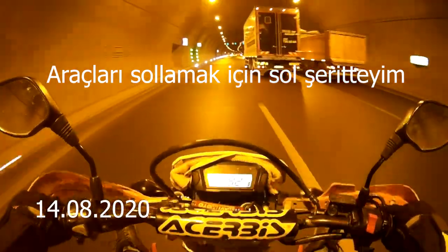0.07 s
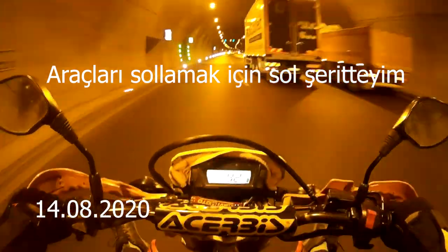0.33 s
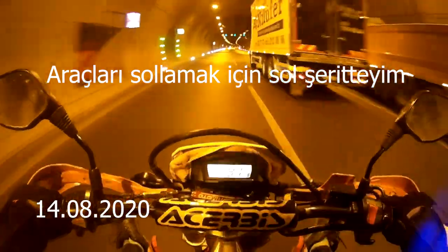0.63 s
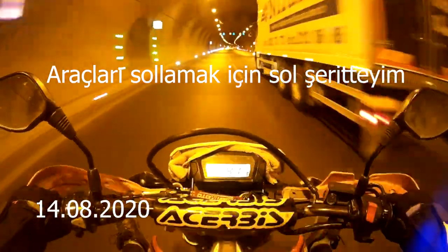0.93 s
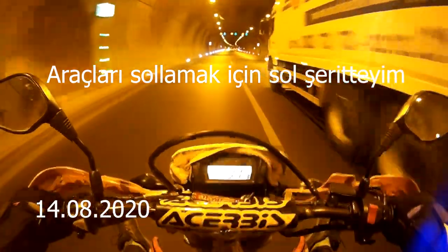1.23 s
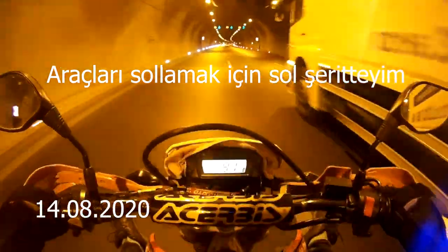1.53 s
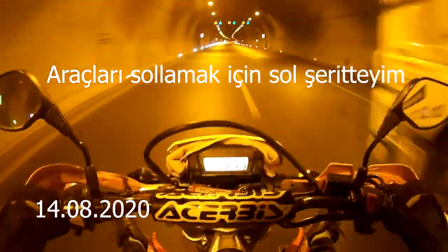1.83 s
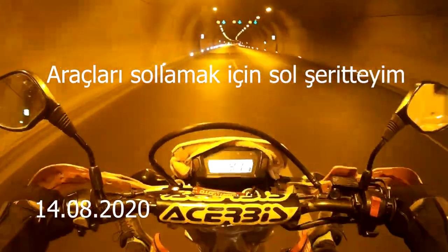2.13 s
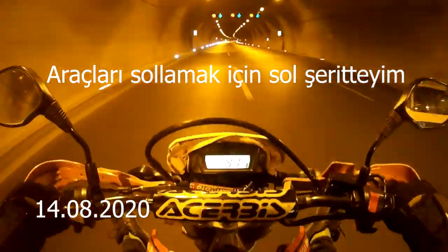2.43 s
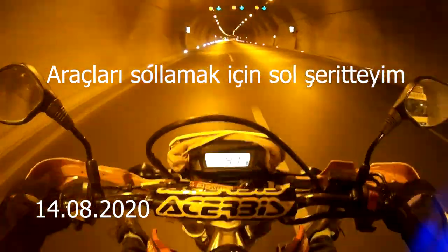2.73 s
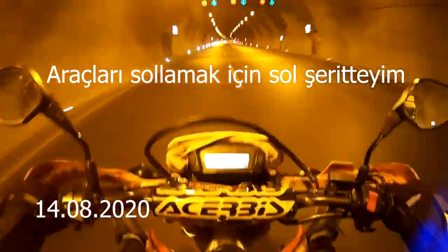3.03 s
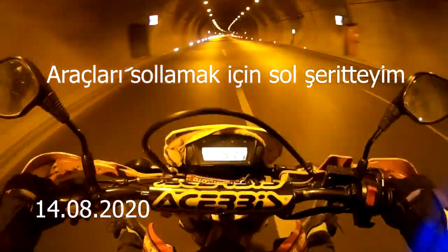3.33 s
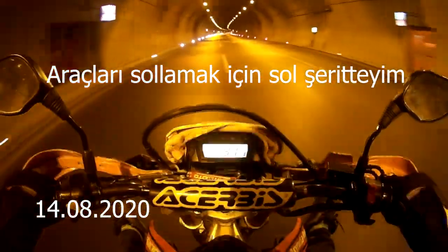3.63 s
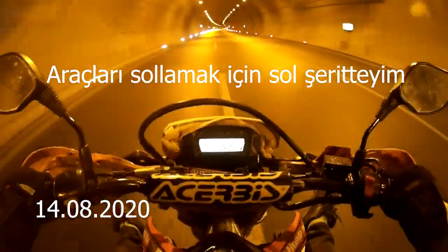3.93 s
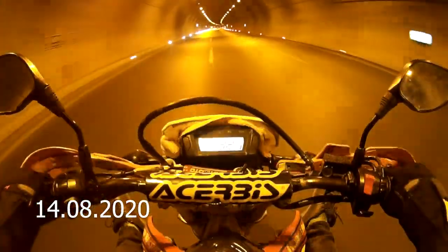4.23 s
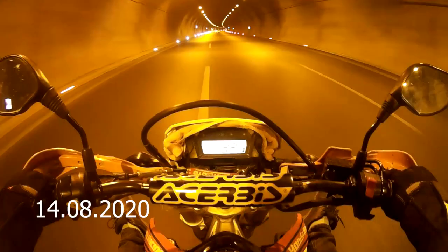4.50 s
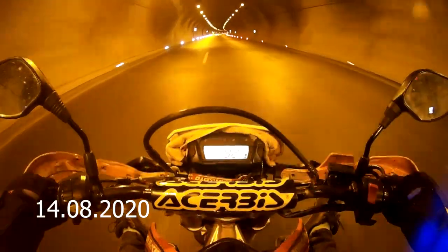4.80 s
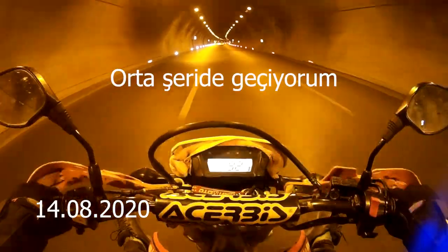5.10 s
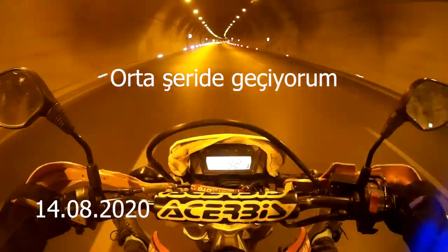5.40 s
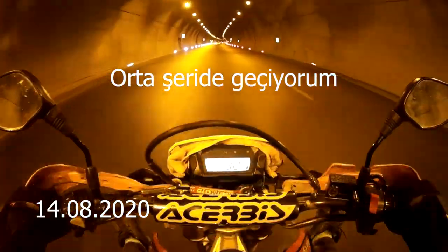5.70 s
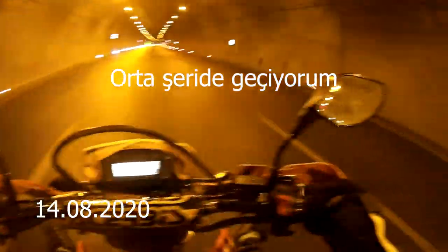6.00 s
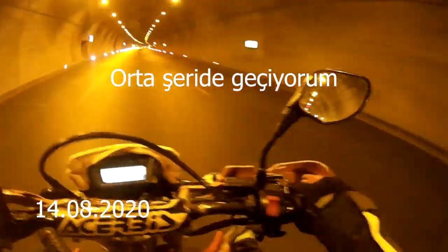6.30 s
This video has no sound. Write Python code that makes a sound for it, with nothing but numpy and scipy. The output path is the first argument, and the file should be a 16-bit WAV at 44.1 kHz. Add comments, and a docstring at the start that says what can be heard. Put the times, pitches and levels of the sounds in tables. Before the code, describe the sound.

A motorcycle cruises steadily through a tunnel, its engine humming under wind rumble and tyre roar as it overtakes a droning lorry.

```python
"""A single-cylinder motorcycle cruises through a road tunnel, heard from the rider's chest.
Its exhaust, chain and gears are periodic sources locked to the crank; they hum over the broadband
noise of turbulent wind and rolling tyres. It overtakes a lorry, whose drone and tyre howl drop in
pitch and reverberate in the tube. After four seconds the throttle opens a little."""
import sys
import numpy as np
from scipy import signal
from scipy.fft import rfft, irfft
from scipy.io import wavfile
from scipy.ndimage import uniform_filter1d

SR = 44100
rng = np.random.default_rng(int(sys.argv[2]) if len(sys.argv) > 2 else 0)


def wav_record(signal):
    """Record a signal, one row per channel, as 16-bit PCM in the file named by sys.argv[1]."""
    frames = np.transpose(np.atleast_2d(signal))
    bounded = np.clip(frames, -1, 1)
    # unit amplitude maps onto the largest positive 16-bit level
    quanta = np.round(bounded * 32767).astype(np.int16)
    wavfile.write(sys.argv[1], SR, quanta)


N = 288855
TIME = np.arange(N) / SR
BIN_HZ = np.maximum(np.arange(N // 2 + 1) * SR / N, 1e-3)

# noise along the ride: (time [s], relative tyre roar level [dB], relative case clatter level [dB])
ROAR_AND_CLATTER = [(0, -35, -51), (1.1, -36, -51), (1.7, -34, -50), (2.2, -35.5, -52), (3.1, -38.5, -52.3),
                    (4, -36.5, -52.5), (5.8, -37.5, -53), (6.35, -36.5, -51.5), (6.55, -41.5, -51.5)]


def from_db(db):
    """Amplitude ratio of a level: tenfold for every 20 dB."""
    return 10 ** (np.asarray(db) / 20)


def rms_one(x):
    """Normalisation to unit mean power."""
    return x / np.sqrt(np.mean(np.abs(x) ** 2) + 1e-20)


def in_time(rows):
    """Linear interpolation of each column after the time column, at every sample."""
    times, *columns = np.transpose(rows)
    return [np.interp(TIME, times, column) for column in columns]


def phase(hz):
    """Phase in radians is the time integral of angular frequency."""
    return 2 * np.pi * np.cumsum(hz) / SR


def swell(at_s, half_length_s):
    """A Gaussian envelope of height 1."""
    return np.exp(-((TIME - at_s) / half_length_s) ** 2)


def drift(cutoff_hz):
    """Slow random modulation: low-passed noise of unit power."""
    times = np.linspace(0, N / SR, 4096)
    hz = np.fft.rfftfreq(len(times), times[1])
    slow = irfft(rfft(rng.standard_normal(len(times))) / (1 + (hz / cutoff_hz) ** 4))
    return np.interp(TIME, times, rms_one(slow))


def noise(spectrum, resonances=()):
    """Spectral shaping: white noise takes on a broad colour and resonance peaks, at unit power."""
    hz, db = np.transpose(spectrum)
    colour_db = np.interp(np.log(BIN_HZ), np.log(hz), db)
    for centre, width, peak_db in resonances:
        colour_db += peak_db / (1 + (2 * (BIN_HZ - centre) / width) ** 2)
    skirts = np.minimum(BIN_HZ / hz[0], 1) ** 2 * np.minimum(hz[-1] / BIN_HZ, 1) ** 2
    white = rfft(rng.standard_normal(N))
    return rms_one(irfft(white * from_db(colour_db) * skirts, N))


def steadied(x, window_s):
    """Division by the running RMS evens out the chance swells of a noise."""
    return x / np.sqrt(uniform_filter1d(x ** 2, int(window_s * SR)) + 1e-9)


def tone(angle, scatter, flutter_hz):
    """Multipath interference: a direct sine plus wall reflections that shift as the bike moves."""
    walls = (drift(flutter_hz) + 1j * drift(flutter_hz)) / np.sqrt(2)
    direct = np.exp(1j * (angle + 2 * np.pi * rng.random()))
    return rms_one(np.real((1 + scatter * walls) * direct))


def partials(angle, series, scatter, flutter_hz):
    """Superposition of multiples of one frequency, each with its own reflections."""
    return sum(from_db(db) * tone(multiple * angle, scatter, flutter_hz) for multiple, db in series)


def motorcycle():
    """Periodic excitation: the firing rate sets the pitch of exhaust, intake, gears and chain."""
    # engine running: (time [s], firing rate [Hz], load level [dB])
    engine = [(0, 45.84, -1), (1.1, 45.75, -1), (2.6, 45.7, -.5), (3.6, 45.76, -.5), (4.3, 45.88, 0),
              (5.1, 46.06, 1.5), (5.9, 46.27, 1), (6.55, 46.5, 1)]
    # exhaust boom: (multiple of firing rate, level [dB])
    exhaust_series = [(1, -49), (2, -36.5), (3, -43.5), (4, -50.5), (5, -45.5), (6, -40)]
    # intake snarl: (multiple of firing rate, level at 0 dB load [dB])
    intake_series = [(7, -42), (8, -52), (10, -54), (11, -50.5), (12, -55.5), (13, -61), (14, -57.5),
                     (15, -60.5), (16, -69)]
    # gears and valve train: (multiple of firing rate, level at 0 dB load [dB])
    gear_series = [(25, -68), (27, -65.5), (32, -70), (45, -70), (50, -74), (52, -68), (54, -68), (55, -71),
                   (58, -67.5), (70, -75), (86, -82.5), (96, -78.5), (97, -83)]
    teeth_per_firing = 22.225
    firing_hz, load_db = in_time(engine)
    cycle = phase(firing_hz)
    exhaust = partials(cycle, exhaust_series, scatter=.66, flutter_hz=3.9)
    intake = from_db(load_db) * partials(cycle, intake_series, scatter=.4, flutter_hz=2.85)
    mesh = from_db(-64.5 + 2.4 * load_db) * tone(teeth_per_firing * cycle, scatter=.93, flutter_hz=2.7)
    gears = from_db(.6 * load_db) * partials(cycle, gear_series, scatter=.74, flutter_hz=3.8)
    return exhaust + intake + mesh + gears + clatter(cycle) + chain(cycle)


def clatter(cycle):
    """Structural resonance: combustion and valve knocks ring the engine cases in every cycle."""
    # knock spectrum: (frequency [Hz], relative spectral level [dB])
    spectrum = [(700, 2), (1080, 1), (1250, 6), (1400, 3.5), (1530, 4.5), (1700, -2.5), (1900, -4),
                (2250, -3), (2500, 0.5), (2800, -3.5), (3400, -12.5), (4500, -14), (5200, -20), (9000, -31)]
    # modes of cases and fairing: (frequency [Hz], width [Hz], peak gain [dB])
    modes = [(2020, 55, 0), (3080, 140, 1), (3860, 210, 4), (4480, 290, 3), (4800, 120, 2.5),
             (5650, 150, 1.5), (5960, 210, 4), (7470, 700, 6), (8450, 160, 7.5)]
    _, clatter_db = in_time(ROAR_AND_CLATTER)
    knock_db = .5 * np.cos(cycle) + .45 * np.cos(2 * cycle) + .45 * np.cos(3 * cycle)
    knocks = from_db(knock_db + .35 * drift(25))
    return from_db(clatter_db + 2.5) * rms_one(knocks * noise(spectrum, modes))


def chain(cycle):
    """Periodic impact of links on the sprocket gives a hum and two whining harmonics."""
    # whine, peaking as the throttle opens:
    # (time [s], relative second harmonic level [dB], relative third harmonic level [dB])
    whine = [(0, -56, -59.5), (.9, -53, -62), (1.35, -50, -53.5), (1.85, -58, -55.5), (3.3, -54, -72),
             (4.85, -51, -59), (5.1, -42.5, -58), (5.3, -46.5, -60), (5.8, -53, -59.5),
             (6.55, -49.5, -52.5)]
    links_per_firing = 6.222
    second_db, third_db = in_time(whine)
    links = links_per_firing * cycle
    hum = from_db(-42.5) * tone(links, scatter=.41, flutter_hz=2.4)
    second = from_db(second_db + 1.5) * tone(2 * links, scatter=.15, flutter_hz=21)
    third = from_db(third_db - .5) * tone(3 * links, scatter=.9, flutter_hz=12)
    return hum + second + third


def lorry():
    """Doppler shift: a diesel drone and howling tyres fall in pitch as the bike goes by."""
    # the pass: (time [s], heard firing rate [Hz], howl frequency [Hz], relative howl level [dB])
    passing = [(0, 85.77, 481.4, -42), (.4, 85.7, 465.8, -42.5), (.8, 84.41, 442, -34.5),
               (1.2, 82.6, 434.9, -42), (1.7, 80.44, 430, -37.5), (2.4, 80.73, 429.8, -43.5),
               (3.5, 80.25, 424.3, -47.5), (4.5, 80.22, 422, -49.5), (6.55, 81.8, 418, -83)]
    # the drone swells and fades along the tube: (time [s], relative level [dB])
    drone_levels = [(0, -28), (.35, -26.5), (.85, -38.5), (1.2, -23), (1.44, -29), (1.54, -22.5),
                    (1.75, -31), (2.15, -24.5), (2.48, -34), (2.75, -25.5), (3.55, -26.5), (3.9, -24),
                    (4.35, -31), (4.75, -27), (5.05, -40), (5.42, -29), (5.95, -34), (6.12, -21.5),
                    (6.55, -30)]
    # its octave booms now and then: (time [s], level [dB])
    boom_levels = [(0, -40), (.32, -23), (.47, -35), (1.45, -37), (1.63, -28), (2.08, -29), (2.3, -38.5),
                   (3, -30.5), (3.25, -36), (3.7, -29.5), (4.4, -33.5), (4.95, -33.5), (5.2, -43.5),
                   (6.55, -33.5)]
    # tread blocks of several lengths: (multiple of howl frequency, relative level [dB])
    tread = [(1, -0.5), (1.075, -10), (1.125, -6.5), (1.19, -17.5)]
    firing_hz, howl_hz, howl_db = in_time(passing)
    (drone_db,), (boom_db,) = in_time(drone_levels), in_time(boom_levels)
    cycle = phase(firing_hz)
    # the drone beats against its reflection from the walls
    beat_hz, crest_s, depth_db = 3.14, 1.565, 4.2
    beat_db = depth_db * np.cos(2 * np.pi * beat_hz * (TIME - crest_s))
    drone = from_db(drone_db + beat_db - 2.5) * tone(cycle, scatter=.55, flutter_hz=7)
    boom = from_db(boom_db) * tone(2 * cycle, scatter=.25, flutter_hz=8)
    howl = from_db(howl_db - .5) * partials(phase(howl_hz), tread, scatter=2.4, flutter_hz=13.3)
    direct = drone + boom + howl
    return direct + lorry_wheels() + from_db(-18) * tunnel(direct)


def lorry_wheels():
    """Band-limited noise: the trailer tyres sing in a narrow band and hiss in a broad one."""
    # wheels going by: (time [s], song level [dB], relative hiss level [dB])
    levels = [(0, -44.5, -61), (.3, -44.5, -57), (.7, -47.5, -63), (1.05, -43.5, -73), (1.35, -52.5, -66),
              (1.7, -70, -72), (2.1, -60, -79), (3, -47.5, -82), (6.55, -82, -85)]
    # tyre song: (frequency [Hz], relative spectral level [dB])
    song_spectrum = [(560, -20), (605, -14.5), (622, 0.5), (655, -12.5), (700, -7.5), (740, -11.5),
                     (800, -31)]
    # tyre hiss: (frequency [Hz], relative spectral level [dB])
    hiss_spectrum = [(1700, 8.5), (2400, -2), (3000, 12.5), (4100, 0), (4600, -6), (5200, -10),
                     (7300, -18.5), (11000, -15)]
    song_db, hiss_db = in_time(levels)
    return from_db(song_db) * noise(song_spectrum) + from_db(hiss_db - 1) * noise(hiss_spectrum)


def tunnel(x, t60_s=1.8):
    """Reverberation: the diffuse field in the concrete tube decays exponentially."""
    tail = rng.standard_normal(N) * from_db(-60 * TIME / t60_s)
    return rms_one(irfft(rfft(x) * rfft(tail), N)) * np.std(x)


def wind():
    """Turbulence: eddies thump as pressure fluctuations while air rushes round the rider."""
    # air, rougher in the lorry's wake: (time [s], buffet level [dB], relative rush level [dB])
    flow = [(0, -25, -25), (.8, -31, -25.5), (1.6, -30.5, -25.5), (2.1, -33.5, -27.5), (3, -29, -27.5),
            (4.3, -30.5, -28), (5.4, -33, -28), (6.55, -30, -28)]
    # gusts on top of that flow: (time [s], buffet rise [dB])
    gusts = [(.09, 0.5), (.76, 6), (1.29, 3), (1.55, 3), (2.42, 2), (3.0, 1), (3.16, 5), (4.02, 0),
             (4.66, 3.5), (4.98, 2.5), (5.89, 6), (6.18, 5.5), (6.37, 4)]
    # buffeting: (frequency [Hz], relative spectral level [dB])
    buffet_spectrum = [(8, -15), (16, 3.5), (28, 3.5), (50, 3), (70, -3), (100, -21), (200, -36)]
    # rush: (frequency [Hz], relative spectral level [dB])
    rush_spectrum = [(60, -0.5), (95, -1.5), (130, 1), (150, -2.5), (185, 0), (205, -1.5), (228, -2),
                     (248, -5), (272, -2), (303, -12.5), (335, -9), (385, -12.5), (500, -36), (900, -41)]
    buffet_db, rush_db = in_time(flow)
    gust_db = sum(rise_db * swell(at_s, half_length_s=.061) for at_s, rise_db in gusts)
    buffet = from_db(buffet_db + gust_db) * steadied(noise(buffet_spectrum), window_s=.22)
    rush = from_db(rush_db - 2 + .15 * gust_db) * steadied(noise(rush_spectrum), window_s=.1)
    return buffet + rush


def tyre_roar():
    """Rolling noise of all the tyres in the tunnel, louder beside the lorry."""
    # roar: (frequency [Hz], relative spectral level [dB])
    spectrum = [(250, -4), (380, -5.5), (440, -1.5), (500, 1), (545, -6), (620, -8), (700, -14), (800, -16),
                (950, -21.5), (1100, -30), (1600, -31.5)]
    roar_db, _ = in_time(ROAR_AND_CLATTER)
    return from_db(roar_db - 1.44) * noise(spectrum)


def hiss():
    """Stationary noise: a faint, even hiss under everything."""
    # hiss: (frequency [Hz], relative spectral level [dB])
    spectrum = [(2000, -13), (6000, -4.5), (10000, -2.5), (14800, -2.5), (16000, -7)]
    return from_db(-69) * noise(spectrum)


def lorry_wake():
    """Turbulence in the wake behind the lorry's cab swells and fades as the bike rides through it."""
    # churning air: (frequency [Hz], relative spectral level [dB])
    spectrum = [(170, -13), (215, 5.5), (300, 4.5), (350, 3), (420, -16)]
    return from_db(-36) * swell(at_s=2.52, half_length_s=.44) * steadied(noise(spectrum), window_s=.1)


def swishes(half_width_octaves=.6, edge_db=-18):
    """Amplitude-modulated noise bands: faint, bright swishes from the road."""
    # swishes: (time [s], half length [s], peak level [dB], centre frequency [Hz])
    events = [(5.212, 0.022, -66, 5600), (6.299, .3, -65, 3900)]
    spread = 2 ** half_width_octaves
    sound = np.zeros(N)
    for at_s, half_length_s, level_db, centre_hz in events:
        band = [(centre_hz / spread, edge_db), (centre_hz, 0), (centre_hz * spread, edge_db)]
        sound += from_db(level_db) * swell(at_s, half_length_s) * noise(band)
    return sound


def scene():
    """Superposition: the pressures of road, vehicles and air add in one channel."""
    background = tyre_roar() + hiss() + swishes()
    return (background + motorcycle() + lorry() + wind() + lorry_wake())[None]


def record(dry, cutoff_hz=15700, fade_s=.004):
    """Band limiting: a steep low-pass cuts the top; short fades keep the ends from clicking."""
    fades = np.clip(np.minimum(TIME, TIME[-1] - TIME) / fade_s, 0, 1)
    low_pass = signal.ellip(12, .2, 80, cutoff_hz, fs=SR, output="sos")
    return signal.sosfilt(low_pass, dry * fades)


dry = scene()
out = record(dry)
wav_record(out)
```